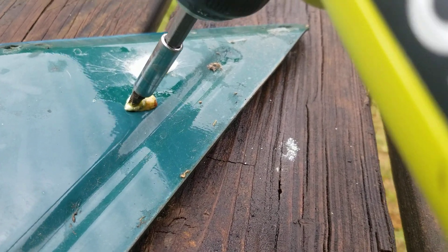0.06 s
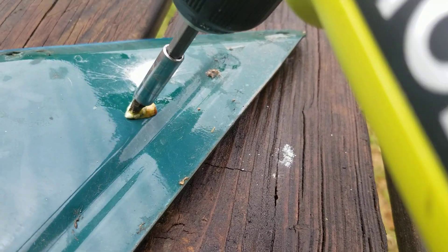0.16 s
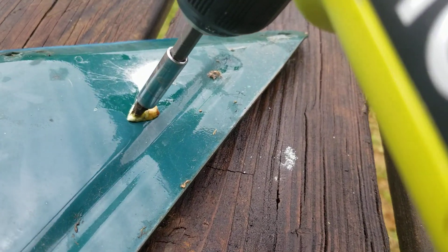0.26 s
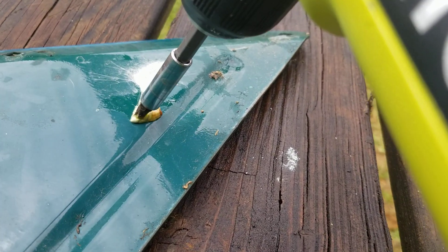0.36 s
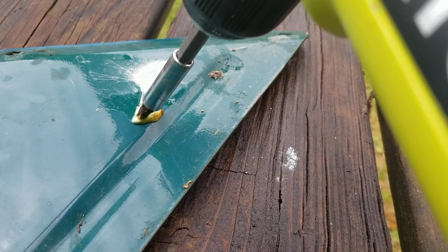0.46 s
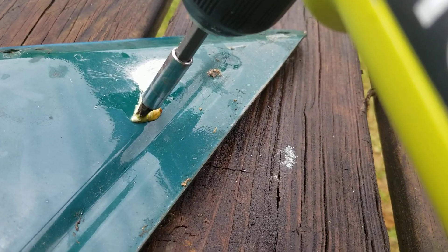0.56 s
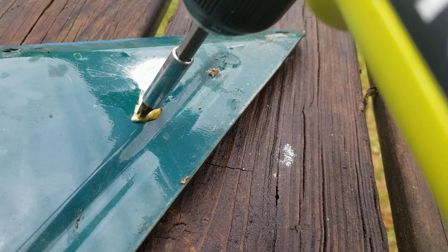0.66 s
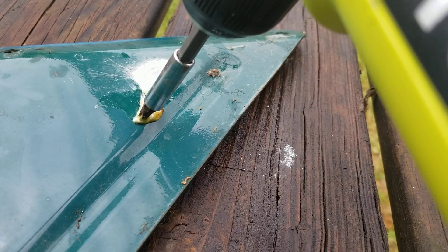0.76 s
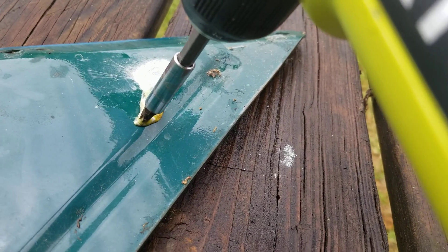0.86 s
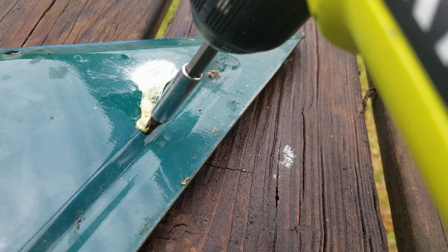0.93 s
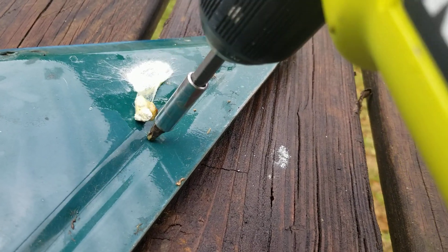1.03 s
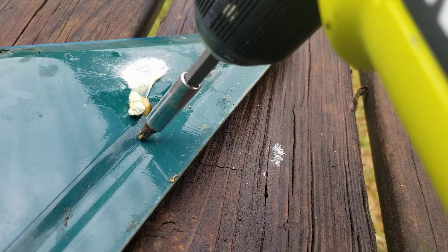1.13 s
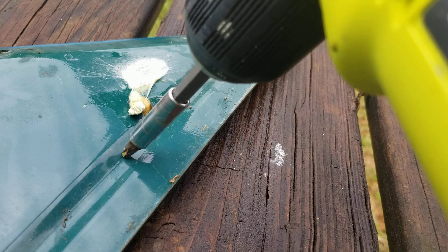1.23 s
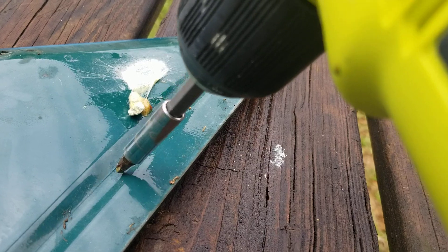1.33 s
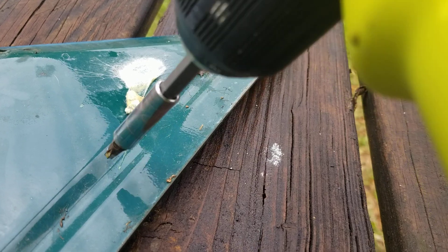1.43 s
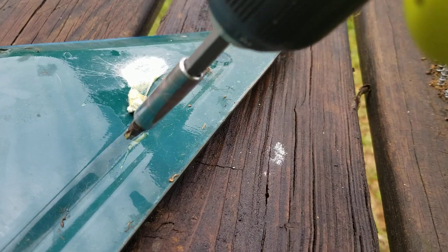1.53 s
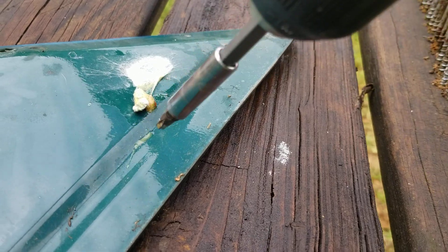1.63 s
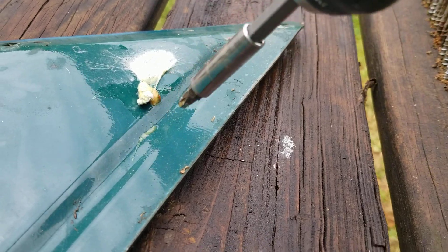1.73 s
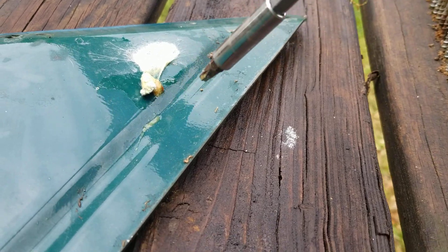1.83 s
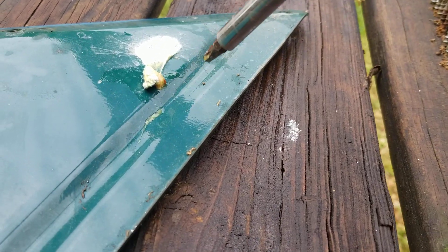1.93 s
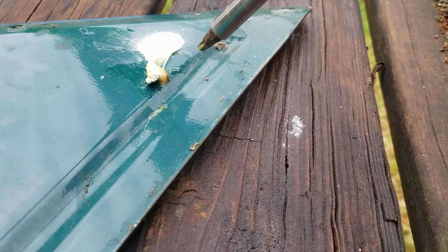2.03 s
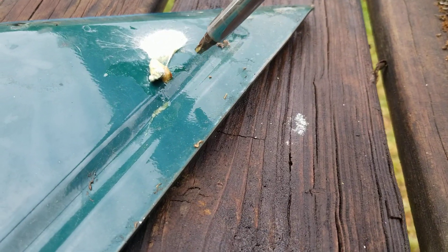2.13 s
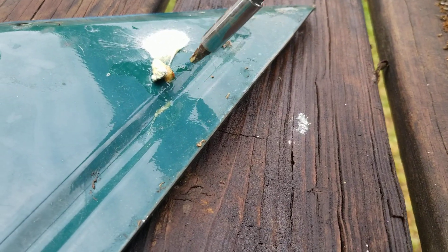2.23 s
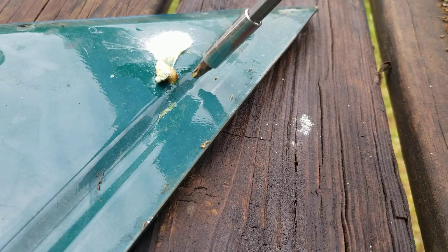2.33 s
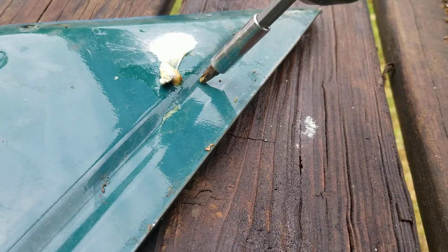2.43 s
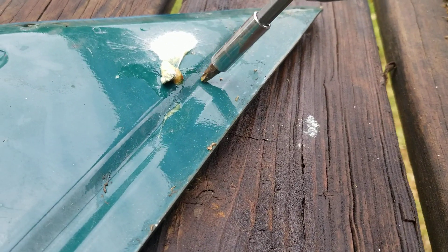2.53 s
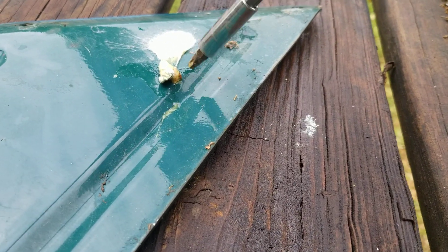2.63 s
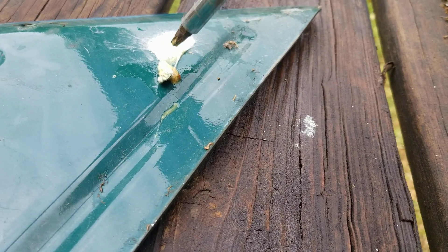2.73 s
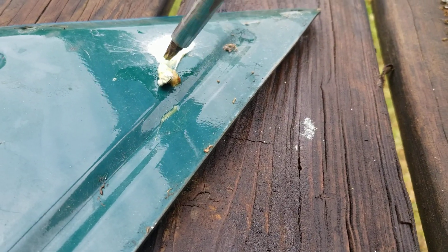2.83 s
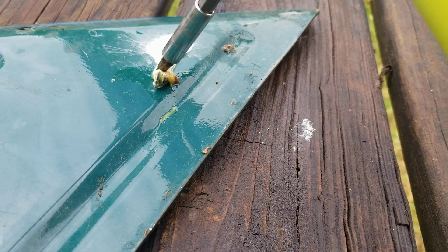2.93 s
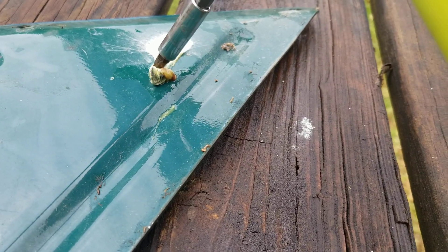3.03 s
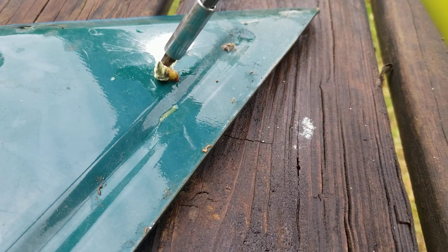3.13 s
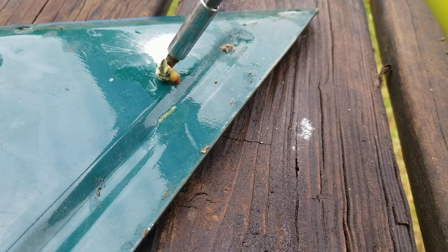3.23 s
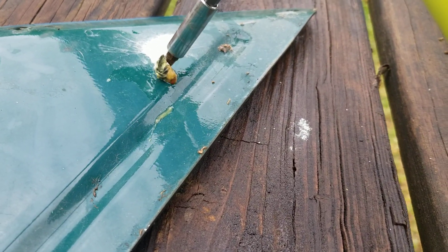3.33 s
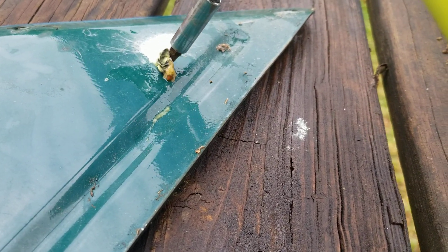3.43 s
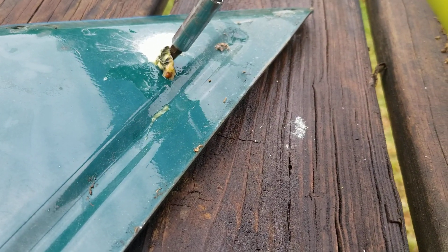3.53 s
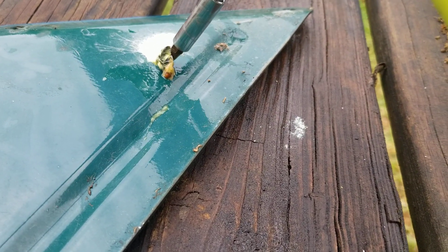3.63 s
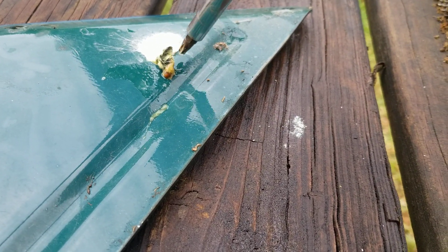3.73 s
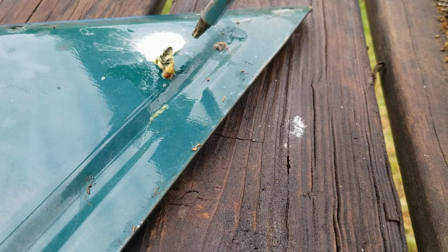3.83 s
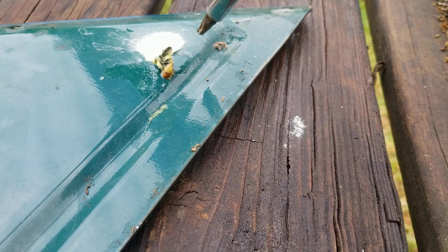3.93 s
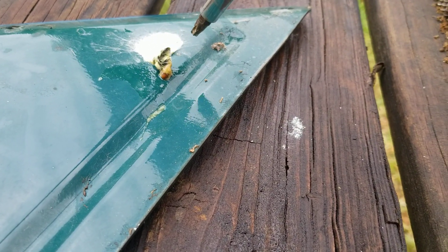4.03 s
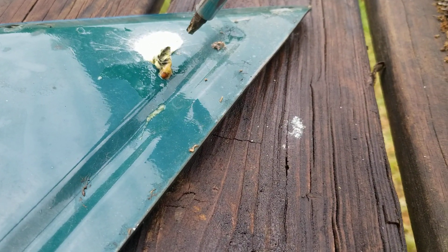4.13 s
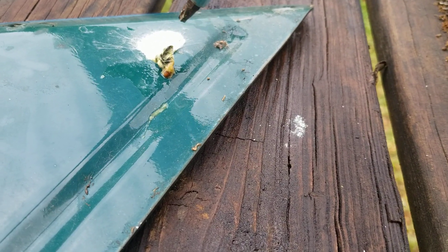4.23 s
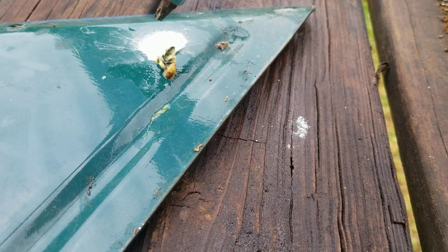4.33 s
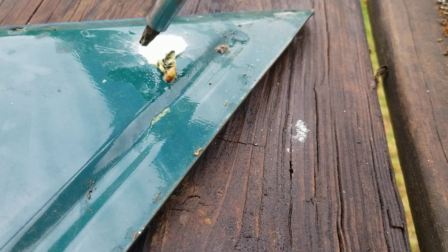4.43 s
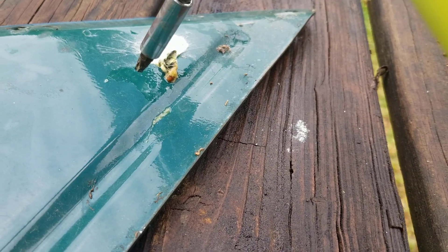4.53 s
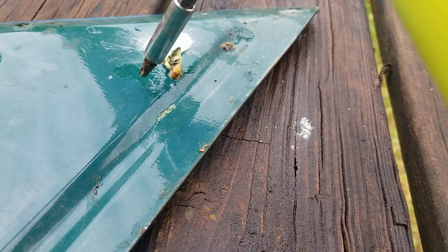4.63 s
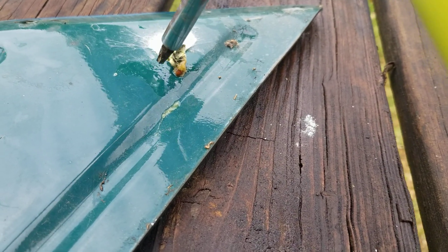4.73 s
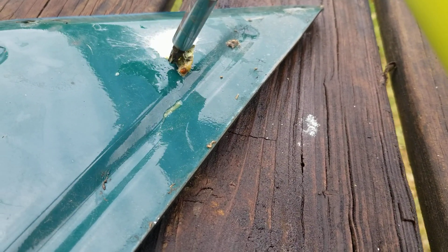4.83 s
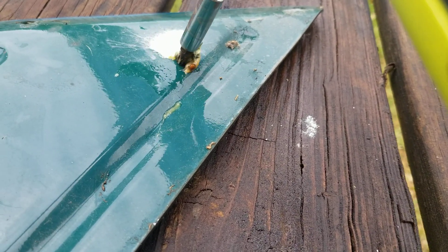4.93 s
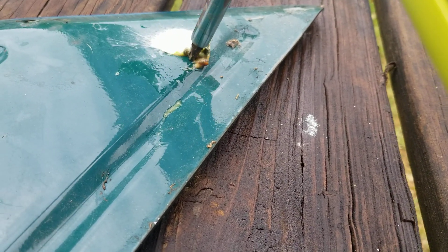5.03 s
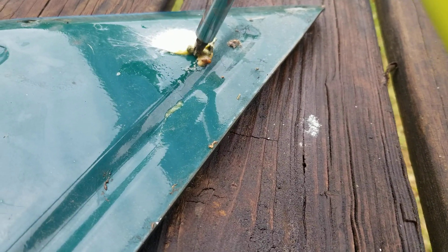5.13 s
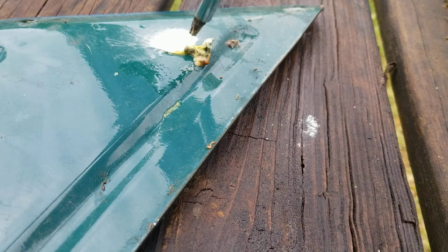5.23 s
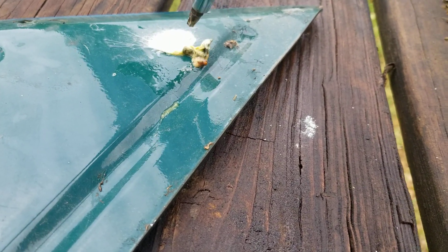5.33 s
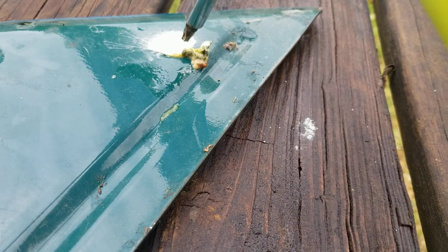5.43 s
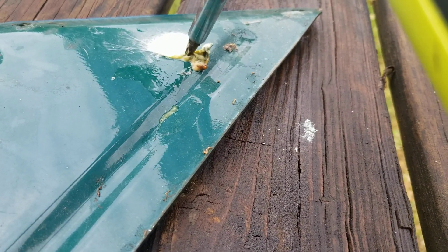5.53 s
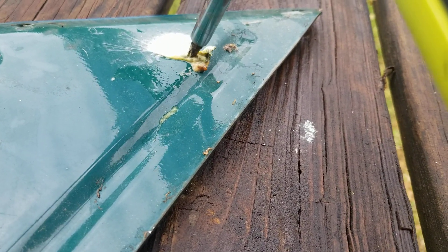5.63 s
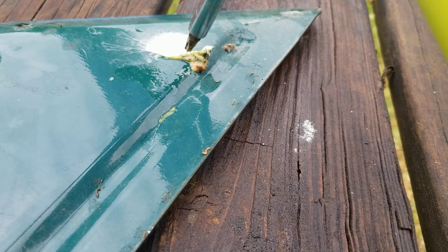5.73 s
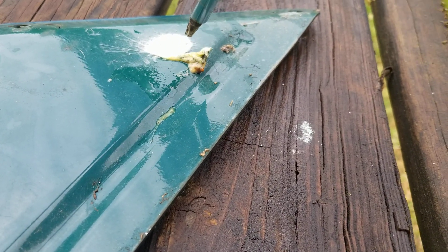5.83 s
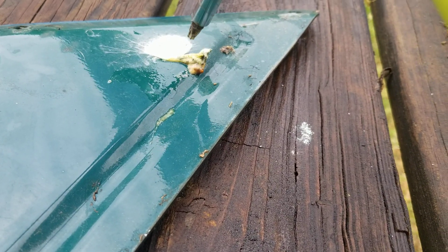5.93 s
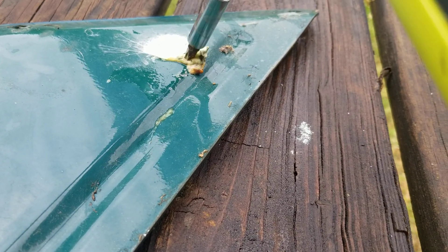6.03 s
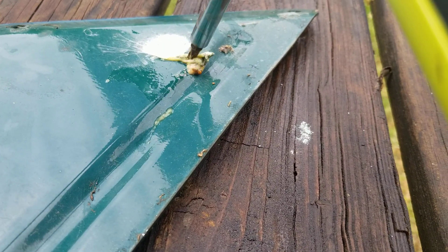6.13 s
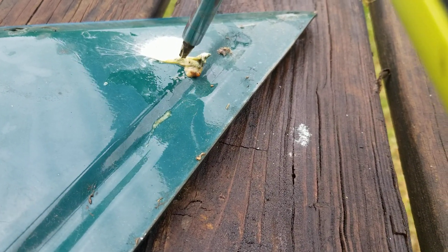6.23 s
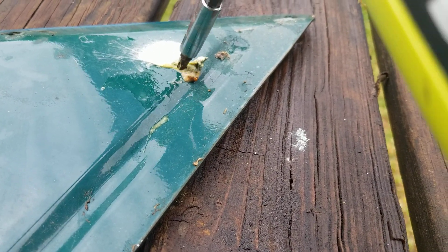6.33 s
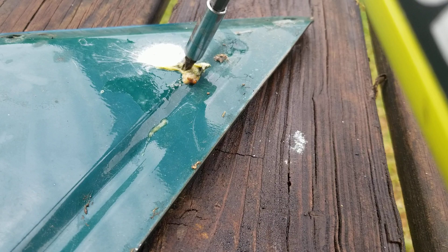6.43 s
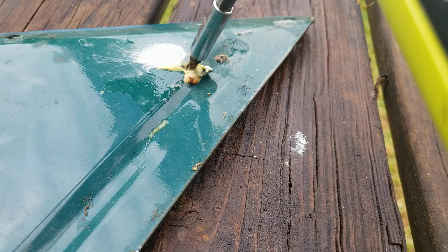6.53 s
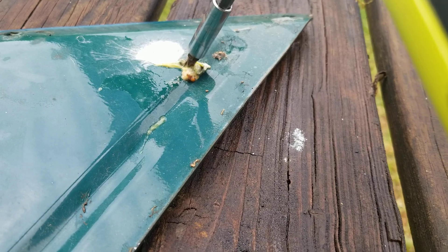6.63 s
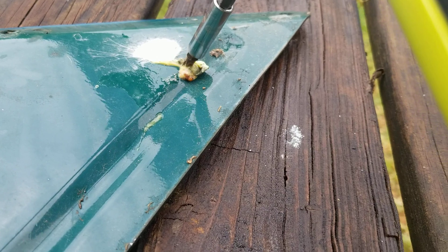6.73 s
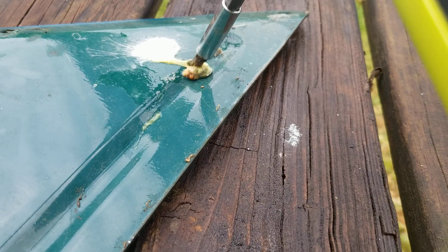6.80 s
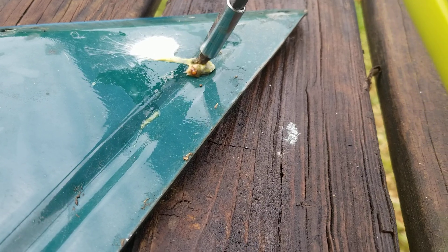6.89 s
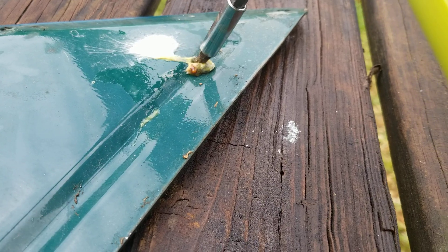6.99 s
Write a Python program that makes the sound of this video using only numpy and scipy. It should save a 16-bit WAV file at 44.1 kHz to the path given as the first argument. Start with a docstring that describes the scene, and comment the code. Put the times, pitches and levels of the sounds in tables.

```python
"""Drill bit on a steel panel

A hand-held drill bit knocks, bounces, scrapes and squeaks on a thin steel panel on a wooden deck, near a phone.
Blows mix bursts of noise with ringing tones; drags are grainy noise and squeaks are wobbling sine tones.
Behind it: a few distant barks (rough pulses through a throat filter), town noise in bands, a low hum and a
far engine whose tone slides and drops. The outdoor level falls after the first heavy blows and creeps back.
One of the two microphone ports is half covered, so the left side is dull around 2 kHz."""
import sys
import numpy as np
from scipy import signal
from scipy.fft import rfft, irfft, next_fast_len
from scipy.io import wavfile
from scipy.ndimage import uniform_filter1d

SR = 44100
rng = np.random.default_rng(int(sys.argv[2]) if len(sys.argv) > 2 else 0)


def generate_wav(signal):
    """Clip the signal to [-1, 1] and save it as 16-bit WAV at the path in sys.argv[1]."""
    frames = np.transpose(np.atleast_2d(signal))
    scaled = np.clip(frames, -1, 1) * 32767
    pcm = np.round(scaled).astype(np.int16)
    wavfile.write(sys.argv[1], SR, pcm)


N = 311340  # samples, about 7.06 s
# Levels in the tables are relative: each layer and the phone scale them further.


def undb(db):
    """Turns decibels into a plain factor."""
    return 10 ** (np.asarray(db) / 20)


def unit(x):
    """Scales a sound to an average (rms) strength of 1."""
    return x / np.sqrt(np.mean(x ** 2))


def along(table, hz):
    """Reads (hz, value) rows at any pitch, with pitch spaced by ratio as the ear does."""
    table_hz, values = np.transpose(table)
    return np.interp(np.log(np.maximum(hz, 1)), np.log(table_hz), values)


def colour(x, table, size=4096):
    """Gives a sound the tone of (hz, gain_db) rows; the filter acts only forward in time (folded cepstrum)."""
    log_gain = along(table, np.fft.rfftfreq(size, 1 / SR)) * np.log(10) / 20
    cepstrum = irfft(log_gain, size)
    cepstrum[1:size // 2] *= 2
    cepstrum[size // 2 + 1:] = 0
    response = irfft(np.exp(rfft(cepstrum)), size)
    response = response.reshape((1,) * (x.ndim - 1) + (-1,))
    return signal.oaconvolve(x, response, axes=-1)[..., :N]


def walk(rate):
    """Random levels held for 1 / rate seconds and smoothed twice; their spread is near 1."""
    hold = int(SR / rate)
    steps = np.repeat(rng.standard_normal(N // hold + 1), hold)
    smooth = uniform_filter1d(uniform_filter1d(steps, hold), hold)
    return np.sqrt(2) * smooth[:N]


def pair(alike, late_samples=0):
    """Left and right noise that share a given likeness; the shared part may reach the left later."""
    shared, own = rng.standard_normal((2, N))
    alike = np.clip(alike, 0, 1)
    left = alike * np.roll(shared, late_samples) + np.sqrt(1 - alike ** 2) * own
    return np.array([left, shared])


def fades(times, db, t60, rise_s):
    """Loudness curve that jumps at every contact and falls 60 dB per t60 seconds; powers add."""
    power = np.zeros(N + SR)
    for start, level_db, fall_s in zip(times, db, t60 + 0 * times):
        i = int(start * SR)
        t = np.arange(int(min(fall_s * 1.5, 1 / 3) * SR)) / SR  # cut off after 1/3 s at most
        rise = np.minimum(t / rise_s, 1)
        power[i:i + len(t)] += undb(2 * (level_db - 60 * t / fall_s)) * rise ** 2
    return np.sqrt(power[:N])


def ring(modes, times, db, shake, scatter_db):
    """Each contact pushes every ringing tone by its own random amount; a shaking force drives them too."""
    out = np.zeros(N)
    at = (times * SR).astype(int)
    chance = rng.standard_normal((len(times), len(modes)))
    for k, (hz, mode_db, t60) in enumerate(modes):
        push = shake + np.zeros(N)
        push[at] += undb(db + scatter_db * chance[:, k]) * np.sign(chance[:, k - 1])
        r = np.exp(-np.log(1000) / t60 / SR)  # loss per sample: 60 dB in t60 seconds
        w = 2 * np.pi * hz / SR
        out += undb(mode_db) * signal.lfilter([0, r * np.sin(w)], [1, -2 * r * np.cos(w), r * r], push)
    return out


# Blows and bounces: start_s, clatter_db, then thump_db, deck_db, treble_db and short_modes_db relative to
# clatter_db, bite_db (panel above BITE_HZ made brighter or duller), clatter_t60_s, treble_t60_s
BIT_BLOWS = [(.948, -28.5, -19, -6, -32, -20, -4, 0.36, .1),
             (.955, -17, -13.5, -10, -26, -12.5, -5.5, 0.56, .11),
             (.976, -11, -19.5, -14, -20, -13, 11, 0.027, 0.038),
             (.985, -4, -22, -25, -7, -18.5, 5, .16, 0.14),
             (.998, -8, -20, -44, -2, -15.5, 5.5, 0.12, 0.12),
             (1.01, -5.5, -18, -7.5, -10, -22.5, 1.5, 0.12, .08),
             (1.024, -35, -12.5, -2, -15, -12.5, 0.5, .12, .08),
             (1.044, -28.5, 0, 3, -30, -19.5, -8.5, 0.13, .16),
             (1.176, -37.5, -8, 6.5, -20, -21, 5, 0.077, .05),
             (1.184, -14.5, -28, -25.5, -8.5, -26.5, 2.5, 0.038, 0.085),
             (1.188, -19.5, -23.5, -9, -10, -5.5, 1, 0.18, 0.23),
             (1.257, -31, -20.5, -5, 0.5, -9, 7, 0.1, 0.033),
             (1.27, -26, -11, -10.5, -11, -10.5, -4.5, 0.15, 0.25),
             (2.402, -10.5, -34.5, -20, -31, -4, -6.5, 0.072, 0.12),
             (2.411, -12, -37, -13, -35, 3, -10, 0.18, .11),
             (2.431, -12.5, -32.5, -9.5, -21, -11, -5.5, 0.09, 0.056),
             (2.443, -18.5, -30, -8.5, 6.5, -5, -2.5, 0.046, .016),
             (2.457, -14.5, -36, -27, -20, -38, -7, 0.04, .1),
             (2.471, -24, -29, -25, -17, -20, 11.5, 0.049, 0.18),
             (2.476, -18.5, -26.5, -14, -17.5, -17, 3.5, .083, 0.32),
             (3.689, -35, -39.5, -26.5, 6.5, -9.5, 2.5, 0.15, 0.23),
             (4.921, -7.5, -35, -17, -42.5, 0, -23.5, 0.028, 0.052),
             (4.928, -3.5, -42.5, -14, -10, -29, -31.5, 0.15, 0.16),
             (4.948, -20.5, -33, -3, -21, -18, -13.5, 0.12, .12),
             (4.997, -21.5, -13, -20, 5.5, -22, -17, 0.035, 0.014),
             (5.011, -46, -14, -20.5, 14, -30, -8, .089, 0.29),
             (6.083, -13, -9, -14, 6.5, -18.5, -4.5, .24, 0.13),
             (6.103, -9.5, -16, -1, -23, -17.5, -22, 0.14, 0.11),
             (6.14, -31, -2, 1.5, -22, -11, -33, .12, 0.17),
             (6.17, -35, -34.5, -8, -25, -24, -23, .1, 0.14),
             (6.184, -30.5, -34, -28, -28, -19, -12, 0.051, .06),
             (6.197, -29, -30, -30, -22, -35, -5, 0.027, .03),
             (6.375, -10.5, -30, -18, -9, -23, -4, 0.079, .11),
             (6.4, -38.5, -3.5, -2, 5.5, -19.5, -1.5, .094, 0.37)]
# Light touches of the tip: start_s, clatter_db, treble_db (relative to clatter_db), treble_t60_s
TIP_TOUCHES = [(0.264, -48, 8, 0.38), (.573, -50.5, 10, 0.35), (0.684, -48.5, 8, 0.27),
               (1.114, -52, 10.5, 0.095), (1.713, -54, 6.5, 0.27), (1.893, -64.5, 4.5, .046),
               (2.581, -42.5, 8, 0.14), (2.974, -57.5, 5.5, 0.24), (3.479, -46.5, -8, 0.29),
               (3.487, -45.5, -1.5, 0.54), (3.531, -49.5, 4, 0.45), (3.546, -48.5, -7, .2),
               (3.968, -58.5, 4.5, .15), (4.188, -55.5, 10, 0.38), (4.433, -54.5, 5.5, .24),
               (4.464, -52.5, 4.5, 0.28), (5.38, -58, 7, 0.33), (5.436, -58, -3, 0.21),
               (5.629, -48.5, 0, 0.2), (5.84, -50, 18, .23), (5.879, -50.5, 10, 0.44),
               (6.699, -41.5, 3.5, .36), (6.741, -48, 17, 0.16), (6.77, -39.5, 8.5, 0.3),
               (6.918, -47.5, 1, 0.027), (6.999, -61, 7, .1)]
# what all light touches share
TOUCH_THUMP_DB, TOUCH_DECK_DB, TOUCH_MODES_DB, TOUCH_BITE_DB, TOUCH_T60_S = -31, -35.5, -21, 1, 0.082


def contacts():
    """Blows and touches in time order, as the columns of BIT_BLOWS."""
    light = [(s, db, TOUCH_THUMP_DB, TOUCH_DECK_DB, treble_db, TOUCH_MODES_DB, TOUCH_BITE_DB, TOUCH_T60_S, t60)
             for s, db, treble_db, t60 in TIP_TOUCHES]
    return np.transpose(sorted(list(BIT_BLOWS) + light))


# Short ringing tones of the steel panel: pitch_hz, level_db, t60_s
PANEL_MODES = [(1351, -11, .09), (1642, -13, .12), (1900, -13, .09), (2024, -11, .11), (2148, -10, .16),
               (2406, -12, .15), (2688, -5, .11), (2905, -6, .1), (3187, -13, .14), (3280, -12, .11),
               (3488, -16, .1), (3865, -14, .11), (3941, -8, .08), (4145, -13, .1), (4343, -10, .09),
               (4600, -14, .08), (4912, -15, .09), (5157, -16, .12), (5395, -15, .13), (5610, -14, .09),
               (5943, -20, .1), (6340, -23, .12), (9430, -21, .08), (10404, -17, .11), (12071, -28, .1)]
# Ringing tones of the wooden deck: pitch_hz, level_db, t60_s
DECK_MODES = [(194, -12, .11), (253, -8, .12), (341, -7, .12), (420, -8, .12), (535, -4, .11),
              (600, -8, .11), (700, -11, .11), (818, -9, .11), (1168, -22, .15)]
# Ping of the steel tip: pitch_hz, level_db, t60_s
BIT_MODES = [(5230, 1.5, 0.0087), (9140, -3.5, 0.014), (3900, -14, .012)]
PING_DB = -6.5  # relative to the treble
# Tone of the chattering sheet, of its treble and of the thump: pitch_hz, gain_db
CLATTER_TONE = [(410, -30.5), (700, -4.5), (1070, -11.5), (1400, 2.5), (1670, -3), (2610, 0), (3710, -10.5),
                (3860, 1.5), (4560, -26), (5500, -19), (6500, -41), (8450, -54.5), (14300, -120)]
TREBLE_TONE = [(2650, -32.5), (4500, -11), (4570, -15.5), (5800, -1), (5950, -9.5), (7430, -13),
               (8450, -3.5), (10900, -10), (11900, -6), (14000, -13), (16300, -33)]
THUMP_TONE = [(30, -44.5), (45, -10), (60, 4), (85, -0.5), (130, -7), (200, -8), (400, -17.5), (900, -42)]
# Free rebounds that leave the sheet singing: start_s, low_song_db, high_song_db
FREE_REBOUNDS = [(1.188, -56, -64), (1.269, -65, -67), (2.404, -43.5, -45.5), (3.688, -52.5, -61.5),
                 (4.926, -41.5, -31.5), (6.375, -60, -49)]
# Longer ringing tones of the freed sheet, low and high: pitch_hz, level_db, t60_s
LOW_SONG_MODES = [(1427, 0, .75), (1758, -6, .65)]
HIGH_SONG_MODES = [(2362, -4, .7), (2461, 0, .7), (2690, -4, .3), (2148, -6, .35), (2915, -9, .2),
                   (3280, -7, .28)]
BITE_HZ = 3400


def bit_on_panel():
    """The loose sheet chatters in a dense, grainy burst, thumps the boards and rings on in a few tones."""
    s, db, thump_db, deck_db, treble_db, short_db, bite_db, t60, treble_t60 = contacts()
    grit = undb(2.0 * walk(900) + 2.5 * walk(220))  # uneven tiny impacts

    tick = fades(s, db, .012, 0.0002)  # first touch of steel on steel
    chatter = grit * (0.28 * fades(s, db, t60, 0.0002) + .5 * tick)
    clatter = unit(colour(pair(0.16, late_samples=3), CLATTER_TONE)) * chatter

    bright_tick = fades(s, db + treble_db, 0.022, .0002)
    bright_tail = fades(s, db + treble_db, treble_t60, .0004)
    treble = unit(colour(pair(0.19, late_samples=19), TREBLE_TONE))
    treble = treble * grit * (0.17 * bright_tail + 0.063 * bright_tick)
    ping = ring(BIT_MODES, s, db + treble_db + PING_DB, 0, scatter_db=3.0)

    thump = colour(pair(0.62) * fades(s, db + thump_db, 0.18, 0.0036), THUMP_TONE) * undb(27)
    shake = rng.standard_normal(N) * chatter
    deck = np.array([ring(DECK_MODES, s, db + deck_db, undb(-39.5) * shake, scatter_db=0.5)
                     for port in range(2)])
    # the boards lie under the phone and reach each port a little differently
    deck = .85 * deck[1] + .3 * deck

    panel = ring(PANEL_MODES, s, db + short_db, undb(-33.0) * shake, scatter_db=1.5)
    free_s, low_db, high_db = np.transpose(FREE_REBOUNDS)
    low_song = ring(LOW_SONG_MODES, free_s, low_db, 0, scatter_db=2.94)
    high_song = ring(HIGH_SONG_MODES, free_s, high_db, 0, scatter_db=1.5)

    sheet = clatter + panel
    dull = signal.filtfilt(*signal.butter(3, BITE_HZ, fs=SR), sheet)
    # the last contact sets the bite, switched from 1 ms before it
    latest = np.maximum(np.searchsorted(s, np.arange(N) / SR + .001) - 1, 0)
    sheet = dull + (sheet - dull) * undb(uniform_filter1d(bite_db[latest], size=90))
    return sheet + treble + ping + thump + uniform_filter1d(deck, size=9) + low_song + high_song


# Drags of the tip over the paint: start_s, length_s, level_db
TIP_SCRAPES = [(0.0, 0.93, -65.5), (0.1, 0.073, -70.5), (0.473, 0.038, -62.5), (1.118, .16, -71),
               (1.328, 0.088, -73), (2.47, 0.069, -70), (3.5, 0.46, -77.5), (4.43, .08, -74.5),
               (4.542, 0.23, -67), (5.02, .1, -63), (5.188, 0.14, -62), (5.316, 0.17, -70),
               (5.77, 0.19, -61), (6.397, 0.14, -62)]
SCRAPE_EDGE_S, SCRAPE_REST_DB = 0.016, -81  # fade time at both ends, level between drags
# Tone of the drags: pitch_hz, gain_db
SCRAPE_COLOUR = [(1500, -27.5), (2300, -5.5), (3000, -14), (4000, -1.5), (4800, -12.5), (5500, 1),
                 (6400, -13), (8000, -27.5)]
# Level of the fine treble rustle over time: time_s, level_db
RUSTLE_LEVEL = [(0.0, -68.5), (.6, -66.5), (1.0, -67), (1.2, -65), (1.4, -79.5), (2.2, -81), (2.5, -73),
                (2.7, -79), (3.3, -79.5), (3.65, -74), (4.3, -79), (5.0, -76.5), (5.7, -77.5), (6.2, -82),
                (6.5, -67), (6.62, -78.5), (7.06, -80.5)]
# Tone of that rustle: pitch_hz, gain_db
RUSTLE_COLOUR = [(5000, -29), (7500, -15), (9000, 3), (10500, -9.5), (12500, -0.5), (15500, -6)]


def rustle():
    """Friction makes fine grains of noise that come and go: the tip's drags and a thin treble hiss."""
    t = np.arange(N) / SR
    grains_db = 2.0 * walk(300) + 2.0 * walk(73)
    drag = undb(SCRAPE_REST_DB)
    for s, length, db in TIP_SCRAPES:
        inside_s = np.minimum(t - s, s + length - t)  # time from the nearer end
        drag = drag + undb(db) * np.clip(inside_s / SCRAPE_EDGE_S + .5, 0, 1)
    scrape = unit(colour(pair(0.16), SCRAPE_COLOUR)) * drag
    hiss_level = undb(np.interp(t, *np.transpose(RUSTLE_LEVEL)))
    hiss = unit(colour(pair(0.13), RUSTLE_COLOUR)) * hiss_level
    return (scrape + hiss) * undb(grains_db)


# Short squeaks where the tip sticks and slips: start_s, length_s, pitch_hz, level_db
TIP_SQUEAKS = [(0.234, 0.047, 2310, -44.5), (0.642, 0.025, 2260, -47), (0.797, 0.04, 2094, -39),
               (3.398, 0.017, 923, -51), (3.606, 0.018, 1980, -50.5), (4.665, .018, 1870, -48.5),
               (4.747, 0.025, 2200, -49.5), (5.272, 0.013, 2480, -52), (5.416, 0.0076, 2180, -43)]
SQUEAK_WOBBLE = 0.079  # typical pitch wobble, as a fraction of the pitch


def squeaks():
    """A tip that sticks and slips gives brief, unsteady tones that swell and stop."""
    out = np.zeros(N)
    wobble = 1 + SQUEAK_WOBBLE * walk(900)
    rasp = undb(3.1 * walk(500))
    for s, length, hz, db in TIP_SQUEAKS:
        i, n = int(s * SR), int(length * SR)
        tone = np.sin(2 * np.pi * hz * np.cumsum(wobble[i:i + n]) / SR)
        out[i:i + n] += undb(db) * np.sqrt(np.hanning(n)) * rasp[i:i + n] * tone
    return out


# Barks: start_s, length_s, top_pitch_hz, level_db
DOG_BARKS = [(5.844, .08, 527, -44), (6.426, 0.0495, 470.6, -46.5), (6.835, 0.0644, 373, -73.5)]
# Tone of the dog's throat: pitch_hz, gain_db
THROAT_TONE = [(300, -17), (480, -19.5), (750, 20), (1000, 6.5), (1300, -9), (1700, -10.5), (2200, 4),
               (2800, -17), (4000, -37.5)]
# the pitch starts a fraction SCOOP below the top; after length_s it sags by a fraction per second
BARK_ATTACK_S, BARK_FALL_DB_PER_S, BARK_SCOOP, BARK_SAG_PER_S = 0.019, 203.5, 0.2, 1.1


def dog():
    """Rough pulses, built from eight harmonics, pass a throat and are smeared by neighbourhood echoes."""
    t = np.arange(N) / SR
    out = np.zeros(N)
    for s, length, hz, db in DOG_BARKS:
        after = np.clip(t - s - length, 0, .2)
        scoop = BARK_SCOOP * np.clip(1 - (t - s) / length, 0, 1)
        pitch = hz * (1 - scoop - BARK_SAG_PER_S * after)
        phase = np.cumsum(pitch * (1 + 0.056 * walk(200))) / SR
        voice = sum(np.cos(2 * np.pi * k * phase) for k in range(1, 9)) * undb(3.5 * walk(90))
        attack = np.clip((t - s) / BARK_ATTACK_S, 0, 1) ** 2
        out += voice * attack * undb(db - BARK_FALL_DB_PER_S * np.maximum(t - s - length, 0))
    out = colour(out, THROAT_TONE)
    tail = np.arange(SR // 3) / SR
    echoes = rng.standard_normal((2, len(tail))) * undb(-32.5 - 60 * tail / 0.35)
    return out + signal.oaconvolve(out[None], echoes, axes=1)[:, :N]


# Tone of the town noise: pitch_hz, gain_db
TOWN_TONE = [(15, -37), (25, -13.5), (76, -0.5), (154, -11), (287, -23.5), (356, -22), (397, -28.5),
             (826, -21.5), (1380, -25.5), (2250, -21), (3200, -32), (5510, -42), (7030, -50),
             (13100, -44.5), (16300, -46.5)]
# Likeness of left and right, held between 0 and 1 when used: pitch_hz, likeness
TOWN_LIKENESS = [(60, 1), (130, 1), (290, 0.88), (640, 1), (1410, -1.2), (3100, -1.7), (6820, -0.36),
                 (15000, -0.5)]


def town(bass_db):
    """Distant noise in octave-spaced bands: all swell together and each flickers by itself."""
    size = next_fast_len(N)
    hz = np.fft.rfftfreq(size, 1 / SR)
    alike = np.clip(along(TOWN_LIKENESS, hz), 0, 1)
    shared, own = rfft(rng.standard_normal((2, size)))
    noise = np.array([alike * shared + np.sqrt(1 - alike ** 2) * own, shared])
    noise = noise * undb(along(TOWN_TONE, hz))
    band = (hz > 400) & (hz < 4000)  # this part of the right side is set to strength 1
    noise = noise / np.std(irfft(noise[1] * band, size))
    octave = np.log2(np.maximum(hz, 1) / 30)
    swell = walk(3.4)
    out = 0
    for k in range(10):
        share = np.cos(np.pi / 2 * np.clip(octave - k, -1, 1)) ** 2
        level = undb(0.27 * swell + 1.1 * walk(27) + bass_db * (k < 3))
        out = out + irfft(noise * share, size)[:, :N] * level
    return out


# Wavering hum tones: pitch_hz, width_hz, level_db (before the bass change)
HUM_TONES = [(60, 8, 6), (89, 5, 0.5), (121, 3.9, -5.5)]
STEADY_HUM_HZ, STEADY_HUM_DB = 59, 9.5  # the core of the lowest tone never drops out


def hum(bass_db):
    """Narrow bands of noise waver like unsteady tones around one unbroken low tone."""
    size = next_fast_len(N)
    hz = np.fft.rfftfreq(size, 1 / SR)
    out = 0
    for tone_hz, width_hz, db in HUM_TONES:
        peak = 1 + ((hz - tone_hz) / width_hz * 2) ** 2
        tone = irfft(rfft(rng.standard_normal(size)) / peak, size)[:N]
        out = out + undb(db + bass_db) * unit(tone)
    core = np.sin(2 * np.pi * STEADY_HUM_HZ * np.cumsum(1 + 0.023 * walk(3.0)) / SR)
    return out + undb(STEADY_HUM_DB + bass_db) * core


# Far engine: time_s, pitch_hz, level_db (before a random flutter)
ENGINE_PATH = [(0, 139, 4.5), (1.0, 150, 0.5), (2.4, 167, 3), (3.6, 174, -4), (3.85, 135, 0.5),
               (4.5, 128, -11), (7.06, 132, -5)]


def engine():
    """A far engine speeds up and changes gear: one sine tone climbs, then drops, with a fluttering level."""
    t = np.arange(N) / SR
    s, engine_hz, engine_db = np.transpose(ENGINE_PATH)
    phase = 2 * np.pi * np.cumsum(np.interp(t, s, engine_hz)) / SR
    return np.sin(phase) * undb(np.interp(t, s, engine_db) + 2.0 * walk(6.1))


# Outdoor background over time: time_s, level_db, bass_db (extra level of hum and lowest town bands)
OUTDOOR_LEVEL = [(0.0, -53.5, 0), (1.0, -53, -0.5), (1.14, -56.5, 4.5), (1.3, -66, 2), (1.73, -67.5, -1),
                 (2.5, -61.5, -2.5), (2.75, -64, -3), (3.21, -62, -3.5), (3.52, -58.5, -3), (4.5, -59, -4),
                 (5.0, -55, -1.5), (5.46, -57, -5), (6.0, -54.5, -5), (7.06, -56.5, -2.5)]


def outdoors():
    """Town, hum and engine add up and share one level, which falls after the first blows and creeps back."""
    t = np.arange(N) / SR
    s, level_rows, bass_rows = np.transpose(OUTDOOR_LEVEL)
    level_db = np.interp(t, s, level_rows)
    bass_db = np.interp(t, s, bass_rows)
    return (town(bass_db) + hum(bass_db) + engine()) * undb(level_db)


def scene():
    """Adds all sources, left and right."""
    return undb(2.0) * bit_on_panel() + rustle() + squeaks() + dog() + outdoors()


# Tone of the half-covered left port: pitch_hz, left_minus_right_db
PORT_TONE = [(60, -1), (200, -2), (380, -3), (700, -7), (1290, -11), (2380, -21), (4400, -14), (8120, -4),
             (15000, -1)]
PORT_LAG_S, TOP_HZ = .00005, 16300  # lag is rounded to whole samples


def record(dry):
    """The covered left port is coloured and late; the phone cuts deep bass, rounds peaks and cuts the top."""
    late = np.interp(np.arange(N) - round(PORT_LAG_S * SR), np.arange(N), dry[0])
    ports = np.array([colour(late, PORT_TONE), dry[1]])
    no_deep_bass = signal.butter(4, 42, "high", fs=SR, output="sos")
    rounded = np.tanh(signal.sosfilt(no_deep_bass, ports))
    no_top = signal.ellip(10, .2, 80, TOP_HZ, fs=SR, output="sos")
    return 0.92 * signal.sosfilt(no_top, rounded)


dry = scene()
out = record(dry)
generate_wav(out)
```